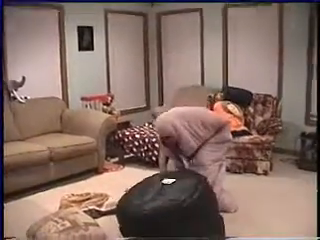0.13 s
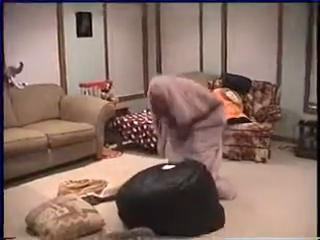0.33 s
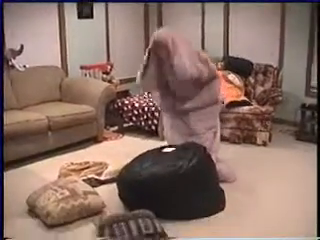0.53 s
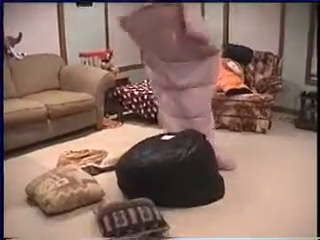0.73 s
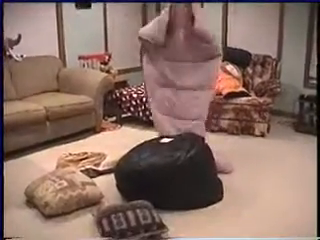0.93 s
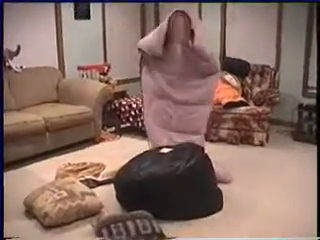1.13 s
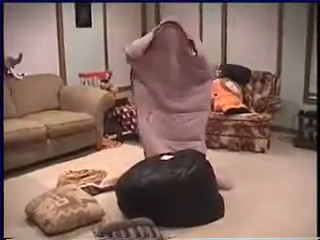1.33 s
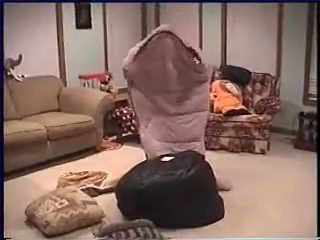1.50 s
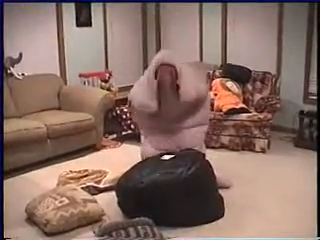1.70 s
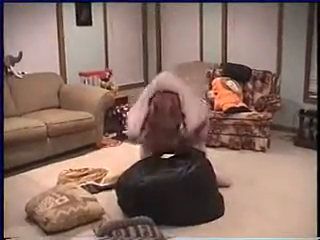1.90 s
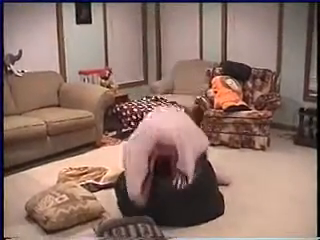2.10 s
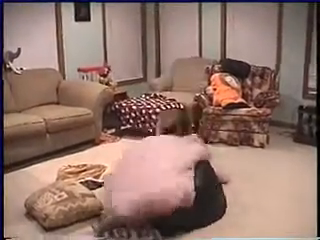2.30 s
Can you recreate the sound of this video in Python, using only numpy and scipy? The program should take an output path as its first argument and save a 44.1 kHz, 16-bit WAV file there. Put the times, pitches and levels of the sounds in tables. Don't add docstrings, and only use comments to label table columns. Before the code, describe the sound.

A soft, heavy beanbag thud peaks near 0.3 seconds, with nylon rustling leading in and a rush of beads and cloth, sinking away by 0.6. Plastic camera-body ticks snap at about 0.5, 0.64, 0.75, 1.1 and 1.6 seconds with short room echo. From 1 second, quiet nylon shuffling and dull scuffs continue, with faint creaks after 2.1. Steady tape hiss and a thin high whistle; left channel only.

```python
import sys
import numpy as np
from scipy import signal
from scipy.io import wavfile

SR = 44100
rng = np.random.default_rng(int(sys.argv[2]) if len(sys.argv) > 2 else 0)


def transcribe(u):
    v = np.clip(np.atleast_2d(u).T, -1, 1)
    q = np.round(v * 32767).astype(np.int16)
    wavfile.write(sys.argv[1], SR, q)


def volts(x):
    e = np.asarray(x, float) / 20
    return 10 ** e


N = 103635


def at_hz(points, hz):
    table_hz, table_db = np.transpose(points)
    return np.interp(np.log(hz), np.log(table_hz), table_db)


def in_time(rows):
    time_s, *columns = np.transpose(rows)
    return [np.interp(np.arange(N) / SR, time_s, column) for column in columns]


def rms_one(x):
    return x / np.sqrt(np.mean(x ** 2) + 1e-20)


def filtered(x, order, hz, kind):
    return signal.sosfilt(signal.butter(order, hz, kind, fs=SR, output="sos"), x)


def drift(rate_hz):
    every = 40
    pole = np.exp(-2 * np.pi * rate_hz * every / SR)
    white = rng.standard_normal(N // every + 2002)
    slow = signal.lfilter([1], [1, -2 * pole, pole * pole], white)[2000:]
    return np.interp(np.arange(N) / every, np.arange(len(slow)), rms_one(slow))


def ring(x, hz, t60_s):
    radius, angle = volts(-60 / (t60_s * SR)), 2 * np.pi * hz / SR
    poles = [1, -2 * radius * np.cos(angle), radius * radius]
    return signal.lfilter([0, np.sin(angle)], poles, x + 1e-18)


def grains(rate_per_s, spread_db):
    size_db = spread_db * np.minimum(rng.exponential(1, N), 4)
    clicks = volts(size_db) * rng.choice([-1, 1], N)
    return rms_one(clicks * (rng.random(N) < rate_per_s / SR))


def coloured(spectrum, patchy_db, grain, tilt_db=0):
    out, together = 0, drift(6)
    edges = 2 ** np.r_[4.5:12:.5, 12:14.1:.25]
    white = rng.standard_normal((2, N)) + grain
    for k, (low, high) in enumerate(zip(edges, [*edges[1:], 19000])):
        band = filtered(white[k % 2], 2, [low, high], "band")
        level_db = at_hz(spectrum, np.sqrt(low * high)) + tilt_db * np.log2(high / 5000)
        flicker_db = patchy_db * (0.33 * together + drift(12.6))
        out = out + band * volts(level_db + flicker_db)
    return rms_one(out)


# (frequency [Hz], density [dB per Hz])
HISS_SPECTRUM = [(20, -1.5), (100, -8.5), (300, -6), (1400, -8), (8000, -17.5), (10500, -16), (13000, -36),
                 (16000, -45)]


def tape_hiss():
    return volts(-61) * coloured(HISS_SPECTRUM, patchy_db=-0.9, grain=0)


def line_whistle():
    whistle_hz, whistle_db = 15734, -77
    return volts(whistle_db) * np.sin(2 * np.pi * whistle_hz * np.arange(N) / SR)


# (time [s], level [dB], brightness [dB per octave])
NYLON_SLIDE = [(0, -50, -0.3), (.2, -46.5, 0.2), (.3, -40, -0.2), (.46, -58.5, -2.3), (.6, -58, -2.5),
               (.85, -57.5, -1.6), (.97, -53, -0.3), (1.15, -49.5, -0.6), (1.24, -51.5, -0.5),
               (1.36, -54, -0.8), (1.56, -52.5, -0.4), (1.7, -53.5, 0), (1.86, -54, -1), (1.92, -52.5, 0.7),
               (2.1, -52.5, 0.5), (2.2, -55, -0.9), (2.3, -55, -0.5), (2.35, -52.5, -0.3)]
# (frequency [Hz], density [dB per Hz])
NYLON_SPECTRUM = [(150, -10.5), (300, -6), (800, -5), (1600, -4), (5000, -6), (9000, -4.5), (12500, -13.5),
                  (16000, -24)]


def nylon():
    slide_db, bright_db = in_time(NYLON_SLIDE)
    rub = 0.47 * grains(rate_per_s=6000, spread_db=3.0)
    return volts(slide_db) * coloured(NYLON_SPECTRUM, patchy_db=0.55, grain=rub, tilt_db=bright_db)


# (time [s], length [s], level [dB])
BAG_SCUFFS = [
    (-0.02, 0.46, -60),
    (1.002, 0.072, -63.5),
    (1.159, 0.2, -58),
    (1.387, 0.097, -52.5),
    (1.476, 0.1, -58.5),
    (1.563, 0.14, -56),
    (2.125, 0.047, -60),
    (2.226, 0.07, -62.5),
]


def scuff_envelope():
    t, out = np.arange(N) / SR, 0
    for start_s, length_s, db in BAG_SCUFFS:
        phase = np.clip((t - start_s) / length_s, 0, 1) ** 0.45
        out = out + volts(db) * np.sin(np.pi * phase)
    return out


# (time [s], thud level [dB], bead and cloth rush level [dB])
WEIGHT_LANDING = [
    (0.19, -63, -61),
    (0.202, -60, -70),
    (0.228, -29, -39),
    (0.288, -18.5, -32.5),
    (0.418, -37.5, -55),
    (0.474, -42.5, -51.5),
    (0.48, -44.5, -53.5),
    (0.536, -47.5, -55),
    (0.6, -87, -91),
]
# (frequency [Hz], width [Hz], level [dB])
BAG_HOLLOWS = [(155.7, 9.8, -4), (187, 8.1, -17.5), (204, 18, -6), (237, 14, -0.5), (274.6, 11, -4),
               (369, 37, -2), (439, 67, -5), (556, 28, -3.5), (630, 25, -9.5), (724, 90, -6),
               (965, 110, -12), (1065, 50, -16)]
# (frequency [Hz], density [dB per Hz])
BEAD_SPECTRUM = [(500, -5.5), (900, 1), (1800, -8), (4300, -15), (8900, -16.5), (12500, -31), (16000, -44)]


def beanbag():
    knocks_per_s, knock_spread_db = 900, 1
    landing_s, darken_db_per_s = .30, 64
    settle_hz, settle_hz_per_s = 298, -330
    thud_db, rush_db = in_time([(0, -90, -90), *WEIGHT_LANDING, (.7, -100, -100)])
    late_s = np.clip(np.arange(N) / SR - landing_s, 0, .3)
    sinking_hz = settle_hz + settle_hz_per_s * late_s
    scuff, out = scuff_envelope(), 0
    for hz, width_hz, db in BAG_HOLLOWS:
        hollow = rms_one(ring(grains(knocks_per_s, knock_spread_db), hz, 2.2 / width_hz))
        octaves_away = np.abs(np.log2(hz / sinking_hz))
        thud = volts(thud_db - 5 + db - darken_db_per_s * late_s * octaves_away)
        scuff_gain = volts(-8 - 3.5 * abs(np.log2(hz / 420)))
        out = out + hollow * (thud + scuff * scuff_gain)
    thuds = filtered(out, 2, 125, "high")
    bead_grains = .5 * grains(rate_per_s=3400, spread_db=3.0)
    rush = coloured(BEAD_SPECTRUM, patchy_db=-0.5, grain=bead_grains)
    return thuds + volts(rush_db + 2.5) * rush


# (frequency [Hz], level [dB], t60 [s])
LUG_MODES = [(536, -14, 0.095), (935, -9, 0.052), (1163, -6.5, 0.046), (1690, -3.8, 0.019),
             (1900, -5.5, 0.023), (3070, -10, 0.023), (5600, -11, .012)]
GRIP_MODES = [(550, -8.5, 0.084), (660, -13, 0.039), (952, -20, 0.12), (1121, -3.5, 0.05), (1152, 6, 0.034),
              (1365, -2, 0.051), (1545, -11, 0.04), (1770, -6.5, 0.035), (2080, -0.5, 0.031),
              (2530, -14, 0.0081), (3560, -18.5, 0.017), (5330, -24, .012), (7460, -11, 0.034),
              (10560, -18, 0.0074)]
LENS_MODES = [(305, -11.5, 0.11), (538, -10, 0.17), (660, -16, 0.066), (763, -3.5, 0.064),
              (960, -18, 0.049), (1154, 0.5, 0.083), (1370, -9, 0.035), (1676, -0.6, 0.048),
              (2000, -6, 0.028), (2545, -5, 0.041), (2920, -8, 0.038), (3410, -8, 0.016),
              (5130, -16, 0.023), (7230, -10.5, 0.011)]
# (time [s], level [dB], brightness [dB per octave], crack level [dB])
STRAP_LUG_TICKS = [
    (.481, -38.5, 6, -36),
    (.487, -41, -6, -40),
    (.493, -41, -5.5, -65),
    (1.106, -40, -0.5, -58),
    (.229, -30, -0.5, -36),
    (1.609, -35, -1, -60),
]
GRIP_SIDE_TICKS = [
    (.640, -46, 8.5, -31.5),
    (.6417, -32, 1.7, -34),
    (0.7536, -28, -1.5, -33),
    (.7568, -40, -12, -49),
    (2.212, -58.5, -6, -66),
    (2.222, -54, -11, -73),
    (2.31, -61, -4, -70),
    (2.342, -61.5, -7, -72),
]
LENS_SIDE_TICKS = [(1.1415, -37.5, 7, -31.5), (1.1438, -49, 7, -31), (1.146, -34, -2.5, -52),
                   (1.1499, -34, -2, -60), (1.18, -57, 5.5, -40), (1.197, -68, 1.5, -42),
                   (1.113, -50, -5, -62), (1.34, -57.5, -6.5, -70), (1.569, -49, -5, -62),
                   (1.618, -48, -7, -67), (2.131, -56.5, -8.5, -74)]


def shell_part(modes, ticks):
    time_s, db, tilt, crack_db = np.transpose(ticks)
    at, out = (time_s * SR).astype(int), 0
    for hz, level_db, t60_s in modes:
        clicks = np.zeros(N)
        scatter_db = rng.normal(0, 5.37, len(at))
        clicks[at] = volts(db + level_db + tilt * np.log2(hz / 1150) + scatter_db)
        out = out - ring(clicks, hz, t60_s)
    ringing = filtered(out, 2, [390, 11700], "band")
    cracks, fade = np.zeros(N), 0
    cracks[at] = volts(crack_db)
    for decay_s, decay_db in [(0.0021, 0), (0.016, -13.5)]:
        fade = fade + volts(decay_db) * signal.lfilter([1], [1, -np.exp(-1 / (decay_s * SR))], cracks)
    return ringing + fade * filtered(rng.standard_normal(N), 2, [2150, 6700], "band")


def camcorder_shell():
    lug = shell_part(LUG_MODES, STRAP_LUG_TICKS)
    grip = shell_part(GRIP_MODES, GRIP_SIDE_TICKS)
    lens = shell_part(LENS_MODES, LENS_SIDE_TICKS)
    return lug + grip + lens


def room(x):
    t60_s, wall_cut_hz = 0.18, 5000
    out, dull = np.zeros(N), np.exp(-2 * np.pi * wall_cut_hz / SR)
    lags = (rng.uniform(.011, .035, 8) * SR).astype(int)
    for k, lag in enumerate(lags):
        loop, gain, state = x.copy(), volts(-60 * lag / SR / t60_s), [0.]
        for i in range(lag, N, lag):
            back, state = signal.lfilter([gain * (1 - dull)], [1, -dull], loop[i - lag:i], zi=state)
            loop[i:i + lag] += back[:N - i]
        out += (loop - x) * (-1) ** k
    return out


def scene():
    room_db, gain_db = -21.5, 6.5
    ticks = camcorder_shell()
    left = tape_hiss() + line_whistle() + nylon() + beanbag() + ticks + volts(room_db) * room(ticks)
    return np.array([volts(gain_db) * left, 0 * left])


def roll_off(x):
    return signal.sosfilt(signal.butter(12, 16770, fs=SR, output="sos"), x)


def record(dry):
    cutoff_hz = 15850
    low_pass = signal.ellip(12, .5, 70, cutoff_hz, fs=SR, output="sos")
    mix = signal.sosfilt(low_pass, dry)
    return roll_off(mix)


dry = scene()
out = record(dry)
transcribe(out)
```